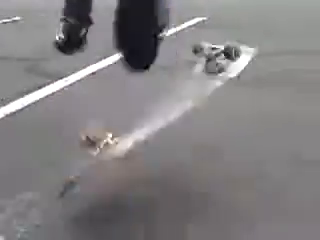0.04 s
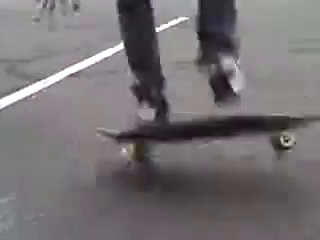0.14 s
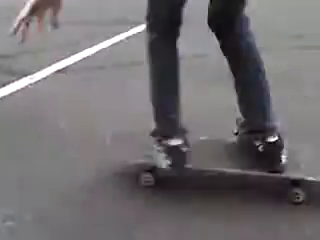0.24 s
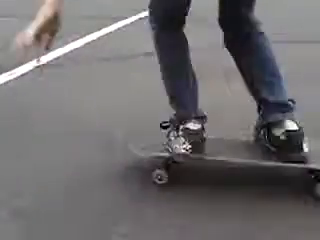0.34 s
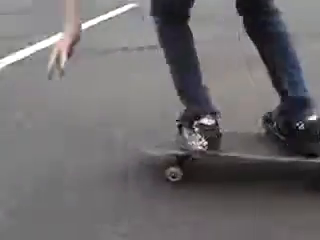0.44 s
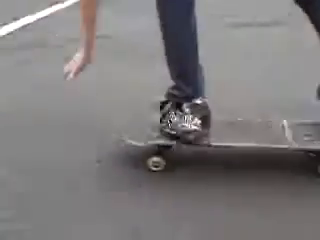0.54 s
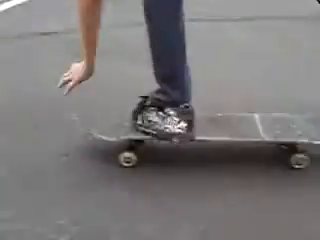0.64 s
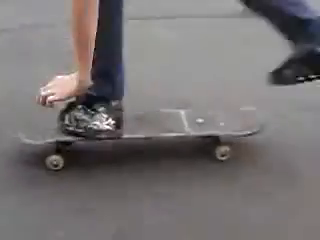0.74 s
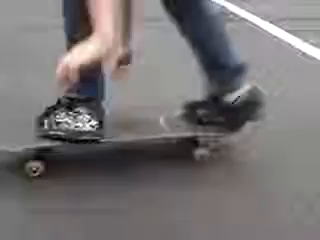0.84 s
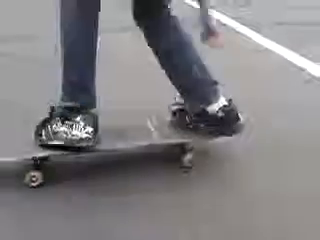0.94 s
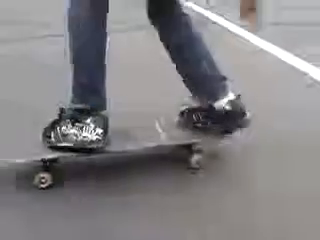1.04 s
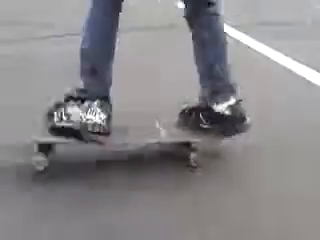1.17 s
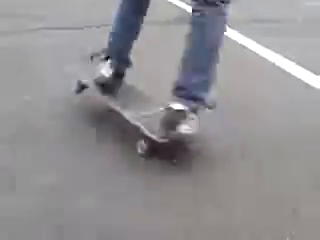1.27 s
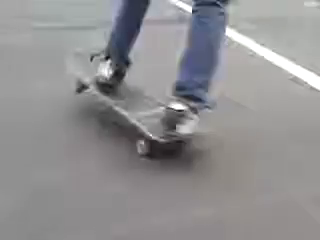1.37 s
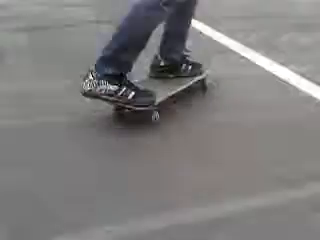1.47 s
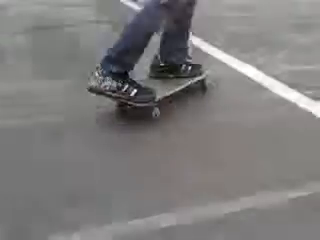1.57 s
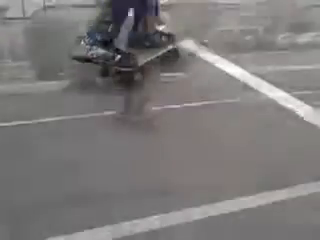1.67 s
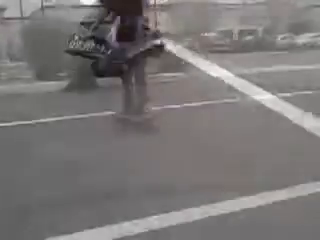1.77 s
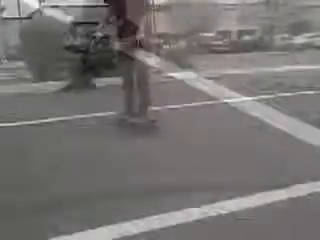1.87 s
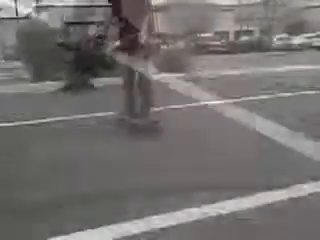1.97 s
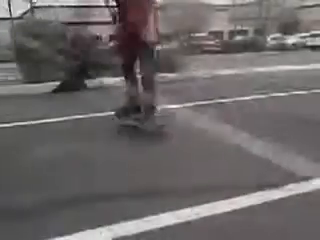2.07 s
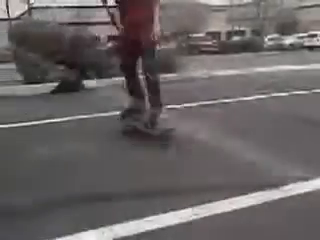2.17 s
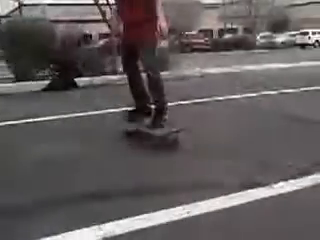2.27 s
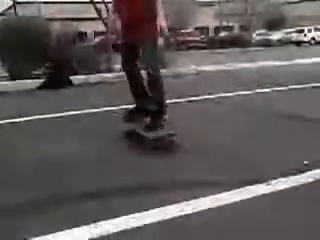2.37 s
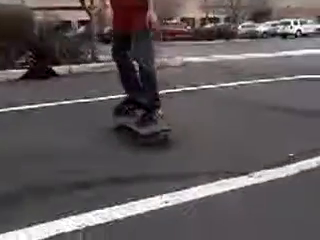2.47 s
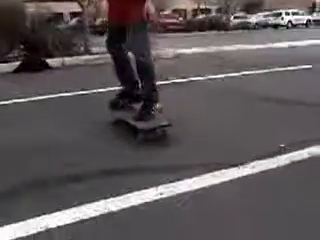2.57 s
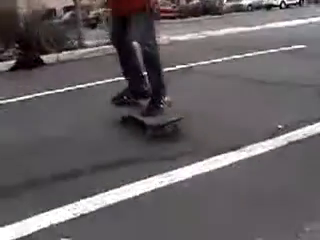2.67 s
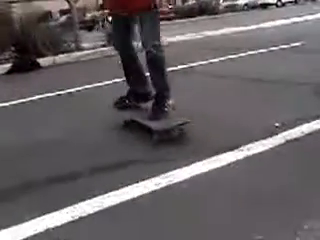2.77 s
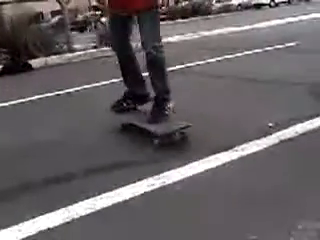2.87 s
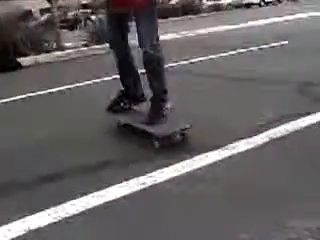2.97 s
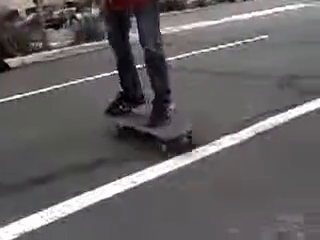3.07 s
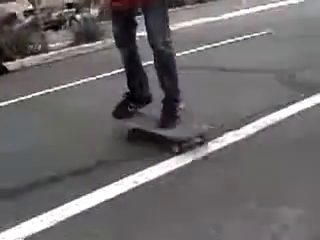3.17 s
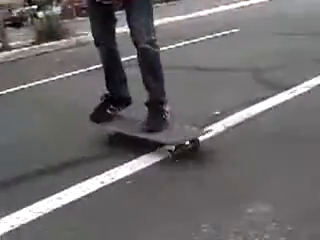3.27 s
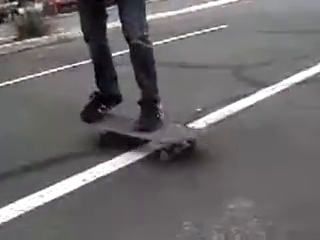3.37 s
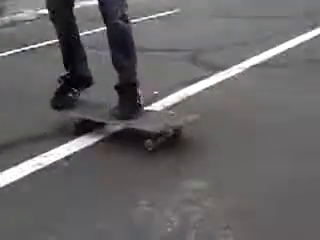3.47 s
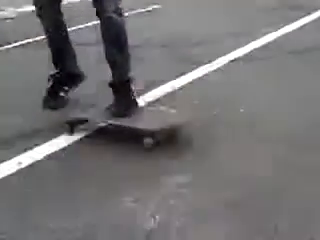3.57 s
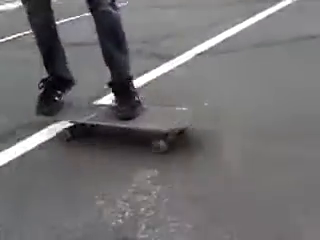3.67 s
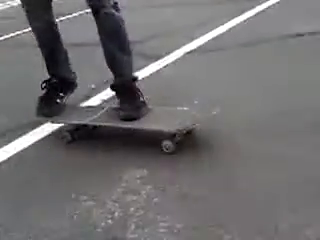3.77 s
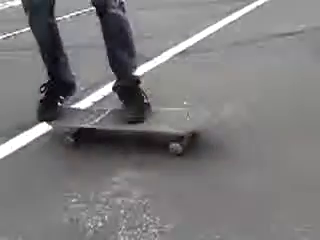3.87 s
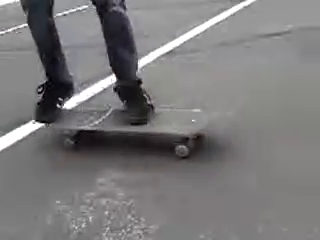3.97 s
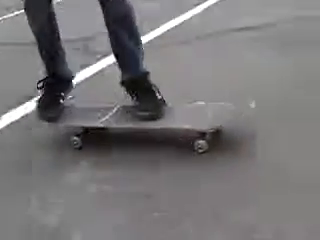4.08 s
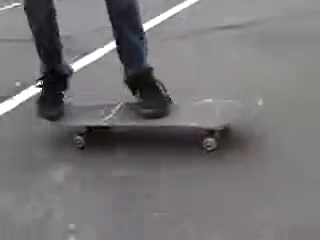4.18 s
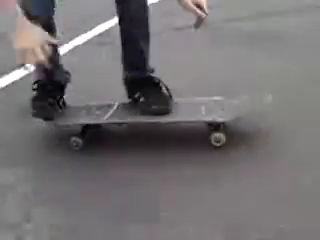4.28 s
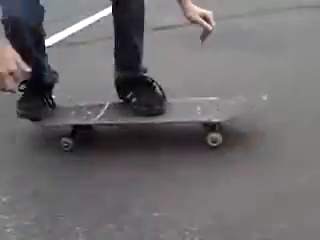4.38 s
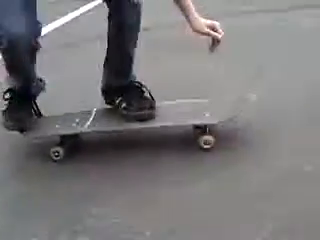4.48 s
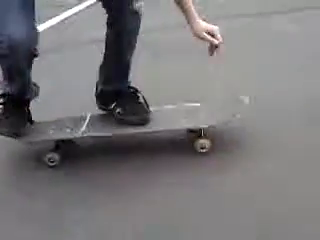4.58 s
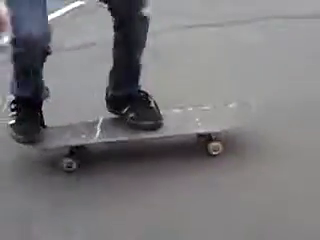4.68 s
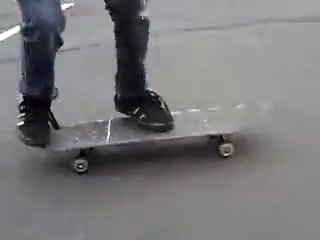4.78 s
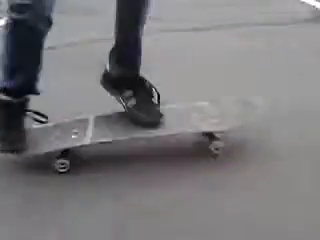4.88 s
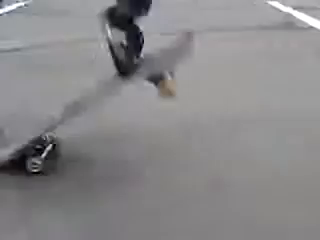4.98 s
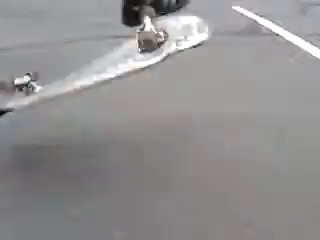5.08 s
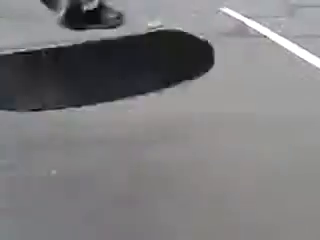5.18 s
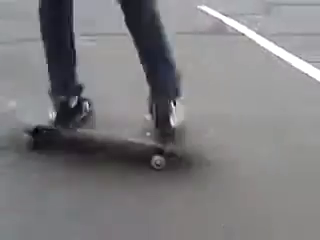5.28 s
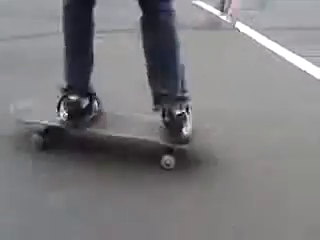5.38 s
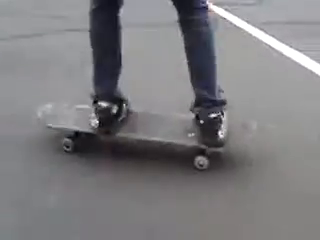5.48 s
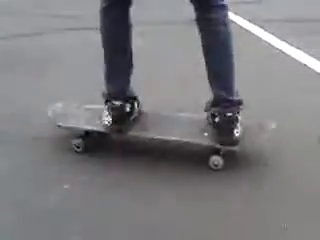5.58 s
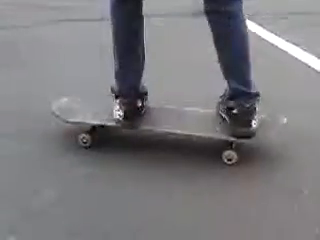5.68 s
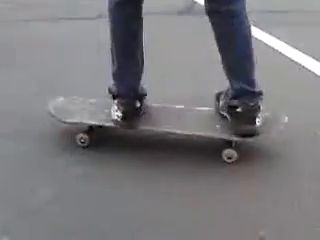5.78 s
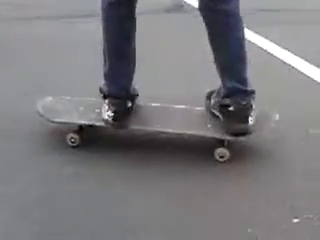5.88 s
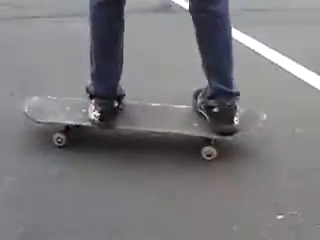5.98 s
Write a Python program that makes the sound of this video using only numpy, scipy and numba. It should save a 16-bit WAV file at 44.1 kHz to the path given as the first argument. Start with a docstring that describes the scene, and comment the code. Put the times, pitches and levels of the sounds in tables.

```python
"""A skateboard on rough asphalt in an open parking lot, a few metres from a cheap microphone.
Rolling over stones and blows of tail, wheels and shoes shake the same deck and trucks, over town noise.
At 1.4 s the wheels slide in a pivot, swelling until they grip at 1.6 s; from 2.1 s an engine hums far off.
At 3.8 s the axles begin to sing less clearly; the last hard blows fall near 5.4 s.
The microphone channel is dull; loud peaks are flattened and loud stretches add treble fizz."""
import sys
import numpy as np
from scipy import signal
from scipy.io import wavfile
from scipy.ndimage import uniform_filter1d
from numba import njit

SR = 44100
rng = np.random.default_rng(int(sys.argv[2]) if len(sys.argv) > 2 else 0)


def output_pcm(signal):
    """Save a mono or channel-first signal as 16-bit PCM at the path in sys.argv[1].

    Samples are clipped to [-1, 1] before scaling.
    """
    pcm = np.clip(np.atleast_2d(signal).T, -1, 1) * 32767
    wavfile.write(sys.argv[1], SR, np.round(pcm).astype(np.int16))


N = 265915
TIME_S = np.arange(N) / SR

# Rolling, relative levels: (time [s], wheel chatter level [dB], deck rumble level [dB], axle pitch [Hz])
ROLL_CURVES = [(0.0, -16.5, -30, 1454), (0.25, -47, -55, 1600), (0.46, -30.5, -28, 1520),
               (0.66, -44.5, -45.5, 1330), (0.9, -61, -39.5, 1710), (1.1, -40, -39.5, 1640),
               (1.33, -50, -42, 1690), (1.55, -41, -26, 1800), (1.71, -36.5, -32, 1406),
               (1.82, -38, -40.5, 1380), (2.01, -33, -37, 1410), (2.15, -34, -41, 1700),
               (2.4, -32.5, -45.5, 1620), (2.6, -39, -43, 1660), (2.92, -36.5, -37.5, 1540),
               (3.4, -34.5, -41.5, 1630), (3.65, -39.5, -43.5, 1765), (4.25, -39.5, -38, 1740),
               (4.6, -43, -44.5, 1675), (4.9, -43, -43, 1790), (5.05, -42, -41, 1705),
               (5.6, -47, -39, 1750), (6.03, -54, -44.5, 1608)]


def undb(db):
    """Gain of a dB value."""
    return 10 ** (np.asarray(db) / 20)


def level(x, db):
    """Scale to an rms level in dB."""
    return x * undb(db) / np.sqrt(np.mean(x ** 2))


def curves(table):
    """Columns of a table after its time column, interpolated to every sample."""
    s, *columns = np.transpose(table)
    return [np.interp(TIME_S, s, column) for column in columns]


@njit
def svf(x, hz, width_hz):
    """State-variable band-pass with a moving centre, gain 1 there."""
    y, band_state, low_state = np.empty(len(x)), 0., 0.
    for i in range(len(x)):
        g, damping = np.pi * hz[i] / SR, width_hz / hz[i]
        drive = x[i] + 1e-18 - low_state  # the offset avoids denormals
        v = (band_state + g * drive) / (1 + g * (g + damping))
        band_state = 2 * v - band_state
        low_state += 2 * g * v
        y[i] = damping * v
    return y


def band(x, hz, width_hz):
    """Band-pass at a fixed or moving centre, prewarped for the sample rate."""
    warped_hz = np.tan(np.pi * (hz + np.zeros(N)) / SR) * SR / np.pi
    return svf(x, warped_hz, 1. * width_hz)


def ring(force, modes):
    """Force through parallel modes of alternating sign; white noise about keeps its rms."""
    power = sum(undb(db) ** 2 * np.pi * width_hz / SR for _, width_hz, db in modes)
    out = 0
    for k, (hz, width_hz, db) in enumerate(modes):
        out = out + (-1) ** k * undb(db) * band(force, hz, width_hz)
    return out / np.sqrt(power)


def walk(rate_hz):
    """Random levels held 1 / rate_hz and slewed twice; spread near 1."""
    k = int(SR / rate_hz)
    steps = np.repeat(rng.standard_normal(N // k + 1), k)
    return 1.82 * uniform_filter1d(uniform_filter1d(steps, k), k)[:N]


def grit(rate_hz, spread_db):
    """Stones at random moments, a few much larger than the rest; rms 1."""
    hit = rng.random(N) < rate_hz / SR
    size_db = spread_db * rng.exponential(size=N).clip(0, 4)
    return level(hit * rng.standard_normal(N) * undb(size_db), 0)


def rolling():
    """Hard wheels chatter over stones into trucks, deck and bolts; axles sing and wheels drum on the road."""
    # rough patches of asphalt: (time [s], extra chatter level [dB], Gaussian width of 2 sigma [s])
    patches = [(0.1, 3, 0.041), (.49, 5.5, 0.056), (1.13, 4, 0.055), (1.704, 15.5, .05), (1.78, 4, .03),
               (1.873, 6, 0.031), (1.929, 4, .06), (2.03, 3, 0.033), (2.168, 3.5, 0.03), (2.3, 4, 0.11),
               (2.755, 6, 0.029), (2.986, 5, 0.045), (3.15, 5, 0.066), (3.276, 8, 0.05), (3.5, 4, .1),
               (3.867, 8, 0.042), (4.063, 4, 0.025), (4.27, 6.5, 0.062), (4.457, 4.5, .06),
               (4.693, -2, 0.039), (4.952, 8, 0.032), (5.792, 5.5, 0.062)]
    # drumming of the wheels on the road: (time [s], level [dB])
    drum = [(0, -24), (.15, -57), (.44, -28), (.8, -52), (1.1, -36), (1.5, -37), (1.71, -26.5), (1.95, -45),
            (2.3, -37.5), (2.92, -34), (3.3, -40.5), (3.8, -32.5), (3.95, -41), (4.2, -35), (4.6, -47.5),
            (5.1, -35.5), (5.6, -39.5), (6.03, -48)]
    # road modes: (centre [Hz], width [Hz], relative level [dB])
    road = [(133, 82, 0), (178, 67, 1.5), (230, 53, -0.5), (289.8, 49, -4)]
    # how clearly the axles sing over the broad chatter
    sing_fast_db, sing_slow_db, slows_s = -1.3, -8.5, 3.83
    jingle_db = -57  # bolts never rest

    trucks_db, deck_db, axle_hz = curves(ROLL_CURVES)
    rough_db = sum(db * np.exp(-((TIME_S - s) / (width_s / 2)) ** 2 / 2) for s, db, width_s in patches)
    sing_db = np.interp(TIME_S, [slows_s - .15, slows_s + 0.14], [sing_fast_db, sing_slow_db])
    trucks_db = trucks_db + rough_db
    road_db = curves(drum)[0] + 0.23 * rough_db
    deck_db = deck_db + 0.26 * rough_db

    stones = grit(1500, 1.3) * undb(2.38 * walk(30.076))
    bumps = grit(600, 2.5) * undb(2.0 * walk(15))
    # rows: trucks, deck, thud, bolts
    force = stones * undb([trucks_db - 11.5, deck_db - 4.0, deck_db - 8.0, trucks_db - 24.5])
    force[3] += bumps * undb(jingle_db + .6 * rough_db + 1.3 * walk(3.3))

    roar = undb(trucks_db - sing_db - 0.5) * band(band(stones, 1500, 1300), 1500, 1300)
    axle_drive = stones * undb(trucks_db + sing_db + 6.5)
    axles = band(band(axle_drive, axle_hz, 420), axle_hz, 420)
    drumming = undb(road_db) * ring(bumps, road)
    return force, axles + roar + drumming


def board(force):
    """All parts of the board ring; light jolts mostly reach the axles, whose pitch is set by the load."""
    # modes of trucks, deck, its low thud and bolts: (centre [Hz], width [Hz], relative level [dB])
    truck_modes = [(1288, 150, 2.5), (1481, 110, 1), (1750, 52, -4), (1822, 53, 13), (1866.6, 78, 9),
                   (2040, 192, 1.5)]
    deck_modes = [(541.6, 79, -4), (650.7, 72, 2), (745, 94, 5.5), (818.4, 200, 1), (1138, 169, -5)]
    thud_modes = [(231, 173, -4), (242, 54, 2.5), (314, 71, -4), (341.3, 63, 0.5), (453, 54, -9)]
    bolt_modes = [(2310, 170, 2), (2700, 160, -2), (2669, 430, -2.5), (3450, 350, -6.5), (3378, 610, -8)]

    trucks, deck, thud, bolts = force
    axle_hz = curves(ROLL_CURVES)[-1]
    play = .12  # the bushings pass only so much force
    bushing_force = play * np.tanh(trucks / play)
    axle = undb(14.5) * band(band(bushing_force, axle_hz, 380), axle_hz, 380)
    metal = undb(-3.0) * ring(trucks, truck_modes) + axle + ring(bolts, bolt_modes)
    wood = undb(2.5) * ring(deck, deck_modes) + ring(thud, thud_modes)
    return metal + wood


def town():
    """Half-octave noise bands that swell together and flicker alone."""
    # spectrum before the overall level is set: (frequency [Hz], relative level [dB])
    spectrum = [(15, -38), (25, -5), (111, -1.5), (152, -6), (215, -3), (358, -12.5), (551, -8.5),
                (734, -10.5), (1200, -17.5), (1810, -24), (3340, -32.5), (4340, -67), (7350, -120)]
    town_rms_db = -38

    table_hz, table_db = np.transpose(spectrum)
    out, swell = 0, walk(.6)
    for hz in 25 * 2 ** np.arange(0, 7.6, .5):
        drift_db = .8 * swell + 1.8 * walk(7)
        db = np.interp(np.log(hz), np.log(table_hz), table_db) + drift_db
        noise = rng.standard_normal(N)
        out = out + undb(db) * band(band(noise, hz, hz / 2), hz, hz / 2)
    return level(out, town_rms_db)


def blows():
    """Each blow is one hard knock, then chatter between wood, metal and ground that dies away."""
    # relative force levels; 60 dB decay capped at 0.2 s:
    # (time [s], trucks level [dB], deck level [dB], thud level [dB], rattle decay [s])
    blow_table = [(0.0161, -5.5, -7, -15.5, 0.044), (0.027, -9, -18.5, -39, 0.043),
                  (0.0425, -18, -26, -45, 0.034), (0.2924, -20, -16, -16, 0.082),
                  (0.3099, -7, -5, -6, 0.04), (0.3211, -1, -5, -8, 0.068), (0.3316, -4.5, -6, -9, 0.1),
                  (0.3461, -9, -4.5, -32, 0.068), (0.3564, -8, -10.5, -17, .04),
                  (0.368, -2, -8.5, -18, 0.045), (0.3748, -12, -12.5, -25, 0.093),
                  (0.4387, -33, -33, -26.5, 0.069), (0.5094, -26, -33, -43, 0.036),
                  (0.5487, -24.5, -28, -42, 0.053), (0.7134, -38, -25.5, -46, 0.06),
                  (0.7227, -24.5, -29, -40, 0.042), (0.9357, -12.5, -18.5, -18.5, 0.064),
                  (0.943, -17, -20, -25, 0.055), (0.953, -19.5, -25, -29.5, 0.061),
                  (1.2761, -21, -28.5, -31, 0.027), (1.4334, -16, -33, -34.5, 0.033),
                  (1.4743, -10.5, -30, -28, 0.1), (1.495, -15, -25, -35, 0.019),
                  (1.5209, -5, -18.5, -32, 0.068), (1.5577, -6.5, -36, -24.5, .07),
                  (1.578, -6.5, -35, -22, 0.092), (1.6006, -2, -21, -23, 0.038),
                  (1.73, -27, -37, -22, 0.063), (1.9169, -23.5, -35, -30, 0.086),
                  (1.9586, -22, -38, -24, 0.044), (1.9733, -23.5, -27, -24.5, 0.072),
                  (2.2548, -19, -29.5, -36, .046), (2.2946, -25, -46, -33.5, 0.079),
                  (2.3235, -20.5, -34.5, -31, 0.14), (2.5157, -12, -24.5, -23.5, .086),
                  (2.5377, -29, -38, -51, 0.24), (2.744, -26, -40, -31, 0.067),
                  (3.025, -28, -35, -43, 0.065), (3.2299, -36, -29, -49, 0.1),
                  (3.273, -29.5, -37, -49, 0.26), (3.414, -31, -40, -33, 0.039),
                  (3.8073, -34.5, -32.5, -45, 0.22), (3.9247, -25.5, -43, -47, 0.033),
                  (4.0695, -32.5, -40, -42, 0.089), (5.0697, -29.5, -34, -29, 0.1),
                  (5.1027, -11, -17, -28.5, 0.094), (5.1169, -17.5, -29, -43, .12),
                  (5.137, -18, -20, -25.5, 0.069), (5.1533, -23.5, -23.5, -36, 0.14),
                  (5.3854, -6.5, -16, -22, 0.052), (5.436, -8, -10, -18.5, 0.063),
                  (5.445, .6, -7, -9, 0.051), (5.4538, -6, -5.5, -29, 0.099), (5.4616, .6, -7.5, -30, 0.06),
                  (5.4696, -7.5, -14.5, -12.5, 0.091), (5.4854, -17, -17.5, -31, 0.083),
                  (5.5516, -18.5, -38, -25, 0.043), (5.896, -41, -33, -32, 0.04)]
    # knock over the chatter, one value each for trucks, deck, thud, bolts: (level [dB])
    knock_db = [2.5, 7.5, 12.5, -2]
    bolts_db, bolts_on_deck, bolts_slope = -6.5, 0.5, 1.01  # bolts follow deck and trucks
    bounce_db, bounce_samples = 2, 90  # the chatter comes in uneven bounces
    shudder_db, shudder_s = -20, 0.042  # loose parts shake on after a blow
    rise_s, knock_sigma_s = 0.003014, .00005  # contact builds up over the rough surface

    t = np.arange(SR // 5) / SR
    count = len(blow_table)
    chatter = rng.standard_normal((count, len(t)))
    bounces = np.repeat(rng.standard_normal((count, len(t) // bounce_samples)), bounce_samples, axis=1)
    chatter = chatter * undb(bounce_db * bounces - bounce_db ** 2 / 11.0)
    knock = undb(knock_db)[:, None] * np.exp(-.5 * ((t - rise_s) / knock_sigma_s) ** 2)
    force = np.zeros((4, N + len(t)))
    for (s, trucks_db, deck_db, thud_db, decay_s), shake in zip(blow_table, chatter):
        start = int((s - .004) * SR)
        decay = np.exp(-np.log(1000) * t / np.clip(decay_s, .005, .2))
        rattle = shake * np.minimum(t / rise_s, 1) ** 2 * decay
        shudder = undb(shudder_db) * shake * np.exp(-t / shudder_s) * (1 - t / t[-1])
        mixed_db = bolts_on_deck * deck_db + (1 - bolts_on_deck) * trucks_db
        gain = undb([trucks_db, deck_db, thud_db, bolts_db + bolts_slope * mixed_db])
        force[:, start:start + len(t)] += gain[:, None] * (knock + rattle + shudder)
    return force[:, :N]


def pivot():
    """Wheels slide sideways, harder until they grip: dense stick-slip over stones with a narrow screech."""
    start_s, grip_s, screech_hz = 1.41, 1.598, 1810
    peak_db, swell_db_per_s, release_db_per_s = -18, 117.5, 697  # drive level

    below_peak_db = np.maximum(swell_db_per_s * (grip_s - TIME_S), release_db_per_s * (TIME_S - grip_s))
    drive_db = peak_db - below_peak_db + 1.7 * walk(58.0)
    rasp = grit(3000, 2.5) * undb(drive_db) * (TIME_S > start_s)
    screech = undb(15.0) * band(band(rasp, screech_hz, 410), screech_hz, 410)
    scrape = undb(12.0) * band(band(rasp, 1500, 950), 1500, 950)
    return screech + scrape


def engine():
    """A far, slowly rising hum whose partials waver with the air on the way."""
    # relative levels: (time [s], firing rate [Hz], fundamental level [dB], overtone level [dB])
    firing = [(2.3, 88.9, -50, -56.5), (2.9, 91, -37.5, -46.5), (3.3, 95.1, -54, -67),
              (3.56, 96.8, -48, -62), (3.68, 96.7, -35, -65), (4.04, 97.6, -34, -53.5),
              (4.3, 99, -28.5, -47.5), (4.75, 98.8, -30, -40), (5.0, 100.6, -28, -44.5),
              (5.2, 102.2, -28.5, -43.5), (5.47, 102.6, -41, -35), (5.6, 104.8, -34.5, -39),
              (5.81, 103.4, -30.5, -40), (5.9, 104.3, -40, -44), (6.03, 105, -31, -40)]
    # overtones: (multiple of the firing rate, relative level [dB])
    overtones = [(2, 1), (3, -6), (4, -8.5), (5, -9.5)]

    hz, db, upper_db = curves(firing)
    phase = 2 * np.pi * np.cumsum(hz) / SR
    upper = sum(undb(d + 0.92 * walk(4.1)) * np.sin(k * phase) for k, d in overtones)
    hum = undb(db + 1.2 * walk(5.6)) * np.sin(phase) + undb(upper_db) * upper
    fade_in = np.clip(TIME_S - firing[0][0] + .2, 0, .2) / 0.26  # settles at 0.77
    return np.sqrt(2) * hum * fade_in


def scene():
    """The board with a few dull echoes, the engine and the town."""
    # echoes off parked cars and kerbs: (delay [s], level [dB])
    echo_table = [(.021, -17.5), (0.045, -31.5), (.078, -29), (0.121, -38.5)]

    chatter, wheels = rolling()
    near = board(blows() + chatter) + wheels + pivot()
    dull = band(near, 1100, 910)
    echoes = sum(undb(db) * np.pad(dull, (int(s * SR), 0))[:N] for s, db in echo_table)
    return (near + echoes + engine() + town())[None]


def record(dry):
    """A dull narrow microphone channel; overload flattens the peaks and makes the treble fizz."""
    mic_hz, band_hz, top_hz = 3194, 4700, 10100  # low-pass corners
    full_scale, knee = 0.9, 9.0  # higher knee: harder clipping

    x = signal.sosfilt(signal.butter(5, mic_hz, fs=SR, output="sos"), dry)
    x = signal.sosfilt(signal.ellip(8, .3, 60, band_hz, fs=SR, output="sos"), x)
    # how hard the input is driven
    strain = np.clip(uniform_filter1d(np.abs(x), size=2000) - .14, 0, .15)
    fizz = undb(-23.5) * strain * band(rng.standard_normal(N), 7200, 6000)
    x = x / (1 + np.abs(x / full_scale) ** knee) ** (1 / knee) + fizz
    return signal.sosfilt(signal.ellip(10, .2, 70, top_hz, fs=SR, output="sos"), x)


dry = scene()
out = record(dry)
output_pcm(out)
```